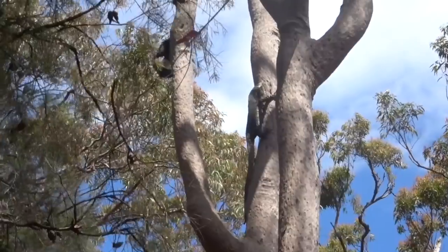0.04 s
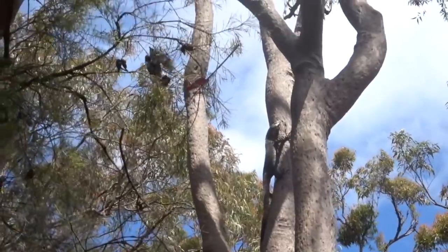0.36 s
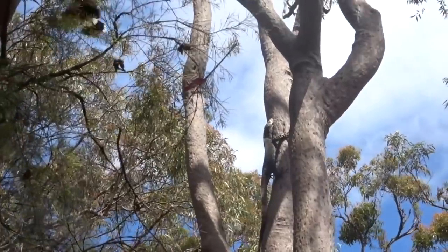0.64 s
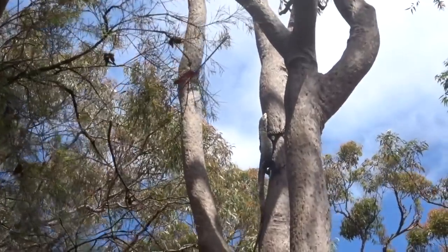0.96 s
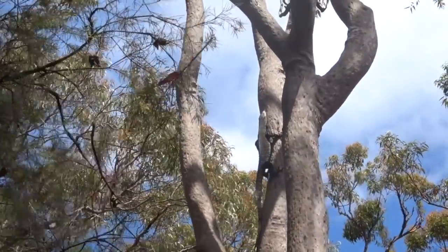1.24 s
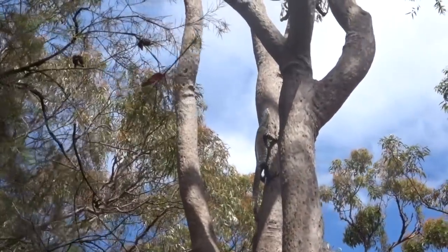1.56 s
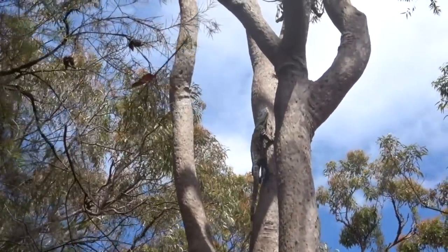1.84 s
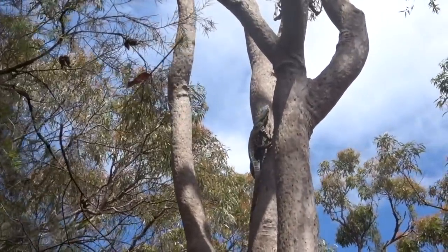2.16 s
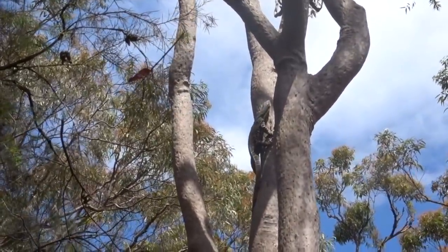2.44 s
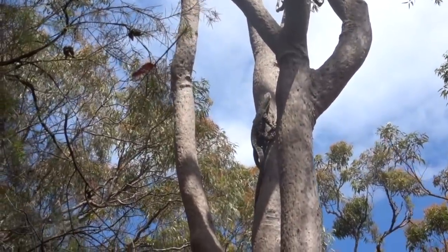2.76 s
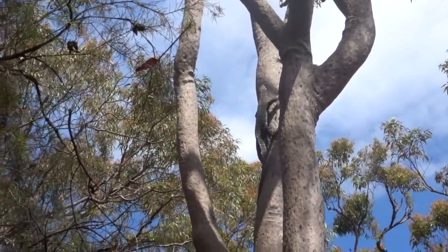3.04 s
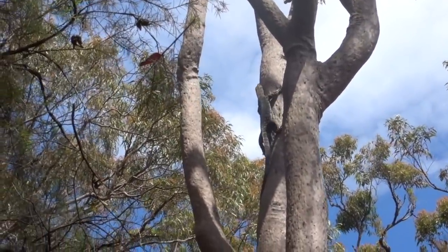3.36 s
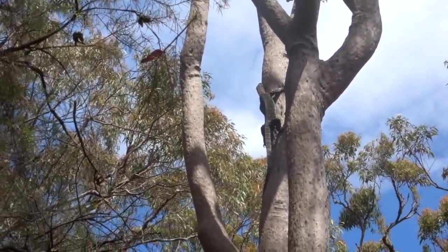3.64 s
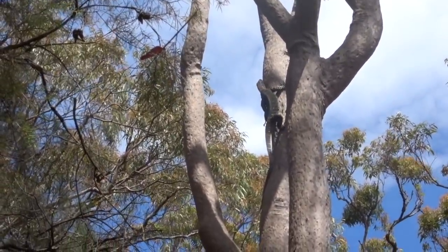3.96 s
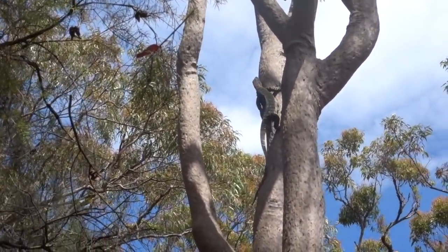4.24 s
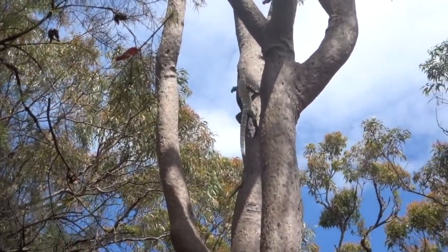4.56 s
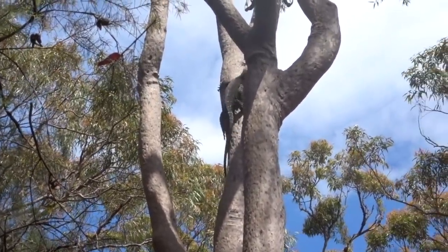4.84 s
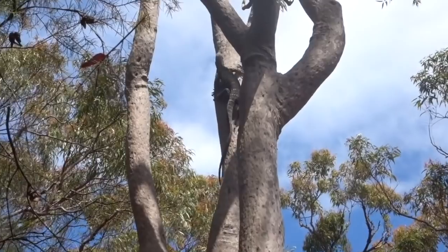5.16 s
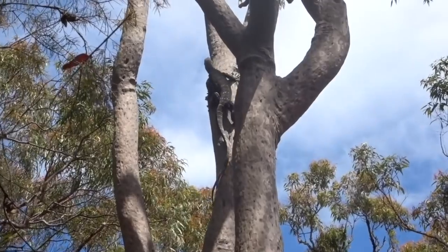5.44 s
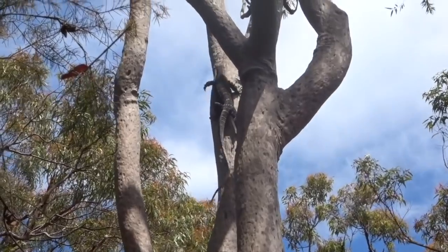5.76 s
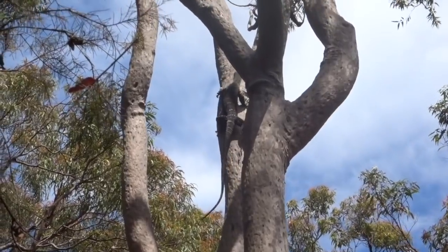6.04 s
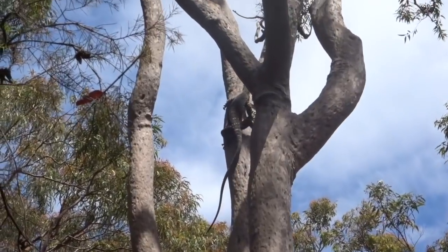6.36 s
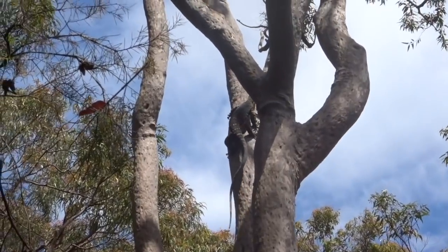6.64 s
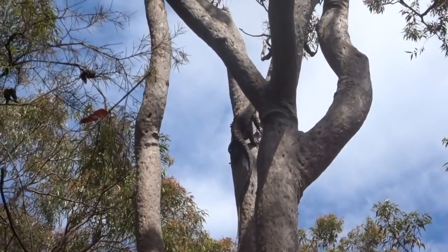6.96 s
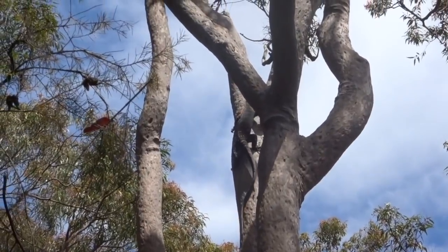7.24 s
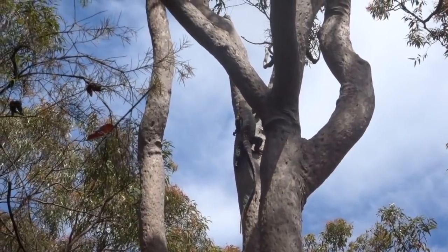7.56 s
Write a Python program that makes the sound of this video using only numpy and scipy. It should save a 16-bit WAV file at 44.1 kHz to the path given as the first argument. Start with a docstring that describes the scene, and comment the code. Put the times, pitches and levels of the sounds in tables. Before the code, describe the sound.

A bird gives five loud, slurred calls in two groups over steadily buzzing cicadas and light wind in a forest.

```python
"""Cicadas buzz in tall eucalypts, tymbal clicks ringing their bodies, over light wind and a faint far hum.
Dry leaves rustle and tick close by. A currawong gives two, then three slurred calls: a harmonic syrinx
tone holds, dives and climbs under the throat resonances, and the forest rings after each.
Wind bumps the microphone in the second half. A hollow click falls in the fourth call;
a small bird whistles far off near the end."""
import sys
import numpy as np
from scipy import signal
from scipy.fft import rfft, irfft
from scipy.io import wavfile

SR = 44100
rng = np.random.default_rng(int(sys.argv[2]) if len(sys.argv) > 2 else 0)


def to_wav(sig):
    """Store sig (one row per channel, or 1-D mono) as 16-bit WAV at the path in sys.argv[1].

    Samples outside -1..1 are clipped; the rate is SR.
    """
    pcm = np.clip(np.atleast_2d(sig), -1, 1) * 32767
    pcm = np.round(pcm).astype(np.int16)
    wavfile.write(sys.argv[1], SR, pcm.T)  # frames by channels


N = 339570
T = np.arange(N) / SR
HZ = np.fft.rfftfreq(N, 1 / SR)

# diffuse sound at the two microphones: (frequency [Hz], left-right coherence [0-1])
COHERENCE = [(30, 1), (120, 0.95), (1000, 0.88), (2500, 0.21), (5000, 0.07), (10000, 0.057)]
# forest reverberation: (frequency [Hz], T60 [s])
FOREST_T60 = [(300, 0.27), (800, 0.59), (1600, 1.12), (4000, 1.21), (9000, 0.39)]

# nearest tymbal speeding up: (initial rate [Hz], settled rate [Hz], time constant [s])
TYMBAL_RAMP = (98.9, 108.2, 6.9)
# tymbal of each cicada: (nominal rate [Hz], coupling to the ramp [0-1])
TYMBAL_RATES = [(102, 1), (117.9, .9), (109.35, 0)]
# body of each cicada: (resonance [Hz], width [Hz], relative level [dB], pan [dB])
CICADA_BODIES = [(4600, 630, -9, -4.5), (4407, 1300, -9.5, -5.5), (4417, 760, -18, 23.5)]
# band a body radiates: (frequency [Hz], gain [dB])
BODY_BAND = [(2800, -48), (3650, 1.5), (5400, 5), (6600, -11.5)]
# far chorus spectrum: (frequency [Hz], relative density [dB])
CHORUS_SPECTRUM = [(1760, -69), (3000, -61), (3470, -9), (3520, -71), (3630, -5.5), (3910, -13.5),
                   (4210, 1), (4640, -9.5), (4860, -15), (5030, -11), (5820, -14), (6190, -38), (6500, -33),
                   (8450, -43), (14300, -120)]
# cicada surges and lulls: (time [s], sigma [s], gain [dB])
CICADA_SURGES = [(0.493, 0.25, 1), (2.4, 0.36, 2), (4.58, 0.28, 2.5), (5.24, 0.2, -7), (5.793, .17, 2.5)]

# air in the trees: (frequency [Hz], relative density [dB])
AIR_SPECTRUM = [(12, -37), (20, -9), (49, -0.5), (67, 1.5), (166, -14.5), (248, -12), (401, -13.5),
                (484, -13), (516, -14.5), (818, -10), (2330, -28.5), (2480, -34.5), (3000, -32),
                (3900, -53), (6600, -120)]
# breeze contour, scaled to drive the rumble: (time [s], relative level [dB])
BREEZE = [(0, -46), (4.35, -46), (4.7, -35), (5.0, -47), (6.2, -41), (7.3, -43), (7.7, -40)]
# far foliage hiss: (frequency [Hz], relative density [dB])
HISS_SPECTRUM = [(2200, -33), (3000, 11.5), (6000, 11), (7000, 3.5), (9000, 6), (11000, -0.5)]
# gusts and soft knocks on the microphone: (time [s], level [dB], sigma [s], nominal top [Hz])
MIC_BUMPS = [(4.639, -19.5, 0.0056, 109), (4.68, -31, 0.02, 100), (4.766, -34, 0.0029, 328),
             (4.815, -28.5, 0.0023, 386), (4.852, -35, 0.0039, 328.5), (5.31, -39, 0.067, 111),
             (5.502, -29.5, 0.018, 140), (6.179, -26, 0.014, 191), (6.28, -36, 0.039, 89.8),
             (6.496, -31.5, 0.014, 195.5), (7.592, -37, 0.044, 128)]
# far hum: (time [s], pitch [Hz], level [dB])
HUM_TRACK = [(1.1, 226, -55), (2.8, 231.6, -62.5), (4.2, 253.7, -56.5), (5.1, 250.7, -60.5),
             (5.6, 250.7, -51), (6.1, 246.2, -53), (6.4, 246, -74), (7.7, 247.7, -59)]

# dry leaf: (frequency [Hz], relative density [dB])
LEAF_SPECTRUM = [(300, -2), (1000, 7), (2500, 2), (4000, 6), (7500, 2.5), (9500, 2.5), (11000, -2)]
# leaves brushed and settling: (time [s], peak [dB], rise [s], decay [s])
RUSTLES = [(.18, -39.5, 0.07, 0.087), (.68, -47, .04, .05), (.795, -36.5, 0.052, .075),
           (1.17, -44.5, 0.052, 0.044), (4.83, -44, 0.24, .05)]
# leaf and twig snaps: (time [s], level [dB], decay [s], tilt [dB/octave], pan [dB])
LEAF_TICKS = [(0.1867, -25, 0.001, 5, 0), (0.2237, -34, .002, 2, 4), (.6508, -26.5, 0.0025, -31, 5),
              (.6588, -24.5, 0.0016, -27, -2), (0.678, -35, .001, 6, 3), (0.7635, -24, 0.00097, -3, -3),
              (0.79, -13.5, 0.0011, 8, -4), (1.173, -36, 0.002, -3, -15), (1.342, -35, .001, 1, -1),
              (3.57, -27, .0015, 1.5, -10.5), (3.579, -23, 0.0011, -7, -11),
              (3.5838, -21.5, 0.0023, 0.5, -5), (4.0868, -29, 0.0013, 0, -2),
              (5.3812, -21, 0.00043, 11, -10), (5.384, -18.5, 0.0017, 1.5, -10.5)]

# currawong calls: (start [s], hold [s], trough [s], climb [s], linger [s], held pitch [Hz],
# trough pitch [Hz], final pitch [Hz], onset offset [dB], held level [dB], change over hold [dB],
# trough level [dB], final level [dB], held overtones [dB], slur overtones [dB], subharmonic [ratio])
CALLS = [ (1.502, 0.13, .065, .078, 0.041, 815, 671, 845.4, -4.5, -15.5, 1, -28, -22.5, -16.5, -23.5, 0.03),
         (2.019, 0.1, 0.029, 0.092, 0.1, 764.3, 625, 808.6, -3.5, -24, 0.5, -34.5, -27.5, -20, -29.5, 0.01),
         (4.492, 0.13, 0.04, 0.081, 0.029, 807.6, 670, 844.5, -10.5, -10.5, -10.5, -33, -20.5, -26, -33.5, 0.07),
         (5.017, .088, .036, .085, 0.041, 767, 619, 816, -1.5, -23, 2, -35.5, -20.5, -27.5, -27.5, 0.02),
         (5.704, 0.18, 0.0074, 0.06, 0.029, 805.5, 592, 748.5, -6, -16.5, -17.5, -35, -24.5, -26.5, -26.5, 0),
         ]
# pose per call: (upper throat resonance [Hz], beamed treble [dB], pan [dB], nominal phase smear [rad],
# fundamental gain [dB], share of reed lift [0-1])
CALL_POSES = [(8130, 0, 3.5, 0.08, 3, 0.6), (8400, -4.5, 1.5, 0.44, 3.5, 0.92),
              (6170, 0.5, 1.5, 1.7, 2.5, 0.2), (7750, -4.5, -1, 0.89, -4, 1),
              (8230, -10.5, -1.5, 0.9, -2, 0.3)]
# throat response, favouring harmonic 2: (frequency [Hz], gain [dB])
THROAT_RESPONSE = [(550, -12.5), (820, -18), (1150, -5), (1350, 3), (1680, -1), (2000, -30.5), (2450, -24),
                   (2900, -39), (3300, -27), (4100, -34), (4900, -22.5), (6000, -28), (8200, -30.5),
                   (9700, -32.5), (11000, -40.5)]
# odd multiples of the squared-off harmonic 2: (harmonic [number], full lift [dB])
REED_LIFT = [(6, 14.5), (10, 2)]
# sharp start of a call: (pitch excess [ratio], time constant [s])
SHARP_ONSET = (0.0249, 0.02245)
# brief dips and catches in the calls' level and pitch:
# (time [s], sigma [s], pitch bend [ratio], gain [dB], brightness [dB])
CALL_DIPS = [(1.527, .006, 0, -10, 9), (1.597, 0.0077, 0, -13, 11.5), (1.67, 0.022, 0.01, -3.5, -0.5),
             (1.699, 0.0086, .07, 2.5, 1), (2.078, 0.0077, -0.047, 1, 3), (2.098, 0.004, 0, -27, 6),
             (4.512, .005, .02, -6, 2), (4.6, 0.00495, -.12, -3, -4), (5.065, 0.0084, -.08, -0.5, -6),
             (5.745, 0.0041, 0, -11.5, 0), (5.764, .006, -.18, -6.5, -1), (5.821, 0.0092, -.18, -2, -11)]
# nasal squawks within the calls: (time [s], length [s], pitch [Hz], source level [dB])
CALL_SQUAWKS = [(1.666, 0.016, 870, -51), (4.616, 0.018, 860, -32.5), (4.632, 0.014, 870, -33.5),
                (5.136, 0.023, 847, -41), (5.848, 0.026, 808, -41)]
# wide-open beak: (frequency [Hz], gain [dB])
GAPE_RESPONSE = [(850, 0), (1700, -23), (2550, 5.5), (3400, 1), (4300, -23), (6000, -35), (8000, -16),
                 (11000, -19.5)]
# hollow click, likely the bill: (time [s], level [dB], decay [s], resonance [Hz], width [Hz], pan [dB])
HOLLOW_CLICK = (5.0400, -22, .0014, 2350, 1000, 6)
# distant small bird: (time [s], pitch [Hz], level [dB])
WHISTLE_TRACK = [(6.72, 2380, -66), (6.80, 2336, -56), (6.90, 2380, -77), (6.98, 2400, -77)]

CUTOFF_HZ = 11130


def amp(db):
    """Decibels to gain."""
    return 10 ** (np.asarray(db) / 20)


def unit_rms(x):
    """Scales to rms 1."""
    return x / np.sqrt(np.mean(x ** 2) + 1e-20)


def lookup(table, hz=HZ):
    """A spectrum table, interpolated in log frequency."""
    table_hz, value = np.transpose(table)
    return np.interp(np.log(hz + 1), np.log(table_hz + 1), value)


def curves(table):
    """Columns of a time table, per sample."""
    times_s, *columns = np.transpose(table)
    return [np.interp(T, times_s, column) for column in columns]


def bell(t, centre_s, sigma_s):
    """Gaussian of height 1."""
    return np.exp(-.5 * ((t - centre_s) / sigma_s) ** 2)


def add(mix, at_s, sound):
    """Mixes a sound in at at_s."""
    part = mix[round(at_s * SR):][:len(sound)]
    part += sound[:len(part)]


def colour(x, gain_db):
    """Filters by a gain per frequency."""
    return irfft(rfft(x) * amp(gain_db), N)


def lowpass(x, corner_hz):
    """Rolls off at 12 dB/octave."""
    return colour(x, -10 * np.log10(1 + (HZ / corner_hz) ** 4))


def wander(band_hz, count=N):
    """Smooth random curve, rms about 1."""
    spectrum = rfft(rng.standard_normal(N)) * np.exp(-(HZ / band_hz) ** 2) * (HZ > 0)
    return unit_rms(irfft(spectrum, N))[:count]


def panned(x, pan_db):
    """Pans by left minus right level."""
    return x * amp([[pan_db / 2], [-pan_db / 2]])


def diffuse(pair, coherence):
    """Two independent spectra to partly coherent left and right."""
    mid, side = np.sqrt(1 + coherence) * pair[0], np.sqrt(1 - coherence) * pair[1]
    return np.array([mid + side, mid - side])


def noise(table):
    """Coloured stereo noise, more alike in the bass."""
    white = diffuse(rfft(rng.standard_normal((2, N))), lookup(COHERENCE))
    return unit_rms(irfft(white * amp(lookup(table)), N))


def forest(x, early_db=4, early_s=0.05, gap_s=0.0049):
    """Trunks and leaves scatter sound: strong near echoes, then a long tail."""
    t = np.arange(2 * SR) / SR
    density = np.minimum(.01 + t / 2, .1)
    taps = rng.standard_normal((2, len(t))) * (rng.random((2, len(t))) < density)
    taps *= (t > gap_s) * (1 + amp(early_db) * np.exp(-t / early_s))
    hz, frame_s, spectra = signal.stft(taps, SR, nperseg=256)
    decay = amp(-60 * frame_s / lookup(FOREST_T60, hz)[:, None])
    spectra = diffuse(spectra, lookup(COHERENCE, hz)[:, None]) * decay
    tail = signal.istft(spectra, SR, nperseg=256)[1]
    return signal.fftconvolve(x[None], unit_rms(tail) / np.sqrt(tail.shape[1]), axes=1)[:, :N]


def tymbal(rate_hz, return_gain=.85, return_cycle=.5035, spread=.1, drift=.0015, tremble=.0003):
    """A tymbal clicks in and out once a cycle."""
    cycles = np.cumsum(rate_hz * (1 + drift * wander(1.6) + tremble * wander(26))) / SR
    click_cycles = (np.arange(1, int(cycles[-1]))[:, None] + [0, return_cycle]).ravel()
    position = np.interp(click_cycles, cycles, np.arange(N))
    size = np.resize([1, -return_gain], len(position)) * (1 + spread * rng.standard_normal(len(position)))
    index, fraction = position.astype(int), position % 1
    clicks = np.bincount(index, size * (1 - fraction), N + 1)
    clicks += np.bincount(index + 1, size * fraction, N + 1)
    return clicks[:N]


def cicadas(level_db=-37.5, far_db=-9, skirt_order=2.21):
    """Tymbal clicks ring three bodies; a far chorus blurs into hiss."""
    initial_hz, settled_hz, settle_s = TYMBAL_RAMP
    ramp = (settled_hz + (initial_hz - settled_hz) * np.exp(-T / settle_s)) / TYMBAL_RATES[0][0]
    near = np.zeros((2, N))
    for (rate_hz, coupling), (body_hz, width_hz, db, pan_db) in zip(TYMBAL_RATES, CICADA_BODIES):
        clicks = tymbal(rate_hz * ramp ** coupling)
        resonance_db = -20 * np.log10(1 + (abs(HZ - body_hz) / (width_hz / 2)) ** skirt_order)
        buzz = unit_rms(colour(clicks, resonance_db + lookup(BODY_BAND)))
        near += amp(db) * (panned(buzz, pan_db) + forest(buzz))
    far = amp(far_db) * noise(CHORUS_SPECTRUM)
    surge_db = sum(db * bell(T, at_s, sigma_s) for at_s, sigma_s, db in CICADA_SURGES)
    return unit_rms(unit_rms(near) + far) * amp(level_db + surge_db)


def wind(air_db=-41.5, hiss_db=-56, rumble_hz=140, flicker_db=-0.5, breeze_depth=0.78):
    """Air in the trees, a rumble that follows the breeze, far foliage hiss."""
    air = amp(air_db) * noise(AIR_SPECTRUM)
    low = lowpass(air, rumble_hz)
    breeze_db, = curves(BREEZE)
    rumble = low * amp(breeze_depth * (breeze_db - breeze_db.mean()))
    rush = (air - low) * amp(flicker_db * wander(7.7))
    return rush + rumble + amp(hiss_db) * noise(HISS_SPECTRUM)


def hum(waver=0.16):
    """A faint low tone drifts and wavers."""
    hz, db = curves(HUM_TRACK)
    return amp(db) * np.sqrt(2) * np.sin(2 * np.pi * np.cumsum(hz) / SR) * (1 + waver * wander(1.2))


def leaf_rustle(grains_per_s=5000, spread_db=3, crossfeed=0.28, stir_db=-57, stir_db_per_s=-2.5):
    """Dense tiny snaps swell as leaves are brushed, over a fading stir."""
    sizes = amp(spread_db * np.minimum(rng.exponential(1, (2, N)), 5)) * rng.standard_normal((2, N))
    grains = sizes * (rng.random((2, N)) < grains_per_s / SR)
    power = amp(stir_db + stir_db_per_s * T) ** 2
    for at_s, db, rise_s, decay_s in RUSTLES:
        swell = np.exp(-np.maximum((at_s - T) / rise_s, (T - at_s) / decay_s))
        power += (amp(db) * swell) ** 2
    return unit_rms(colour(grains + crossfeed * grains[::-1], lookup(LEAF_SPECTRUM))) * np.sqrt(power)


def leaf_ticks(forest_db=-21, antiphase=0.04, crackle_db=-19, crackle_s=0.0034, lead_s=.015):
    """Fibres crackle around each snap, so close that the two microphones disagree."""
    ticks = np.zeros((2, N))
    t, hz = T[:2048] - lead_s, np.fft.rfftfreq(2048, 1 / SR)
    octaves = np.log2(np.maximum(hz, 900) / 4000)
    for at_s, db, decay_s, db_per_octave, pan_db in LEAF_TICKS:
        response = amp(lookup(LEAF_SPECTRUM, hz) + db_per_octave * octaves) * (hz < CUTOFF_HZ)
        burst = irfft(rfft(rng.standard_normal((2, len(t)))) * response)
        burst = panned(unit_rms(burst - antiphase * burst[::-1]), pan_db)
        snap = (t >= 0) * np.exp(-abs(t) / decay_s)
        crackle = amp(crackle_db) * np.exp(-abs(t) / crackle_s)
        for channel, sound in zip(ticks, burst):
            add(channel, at_s - lead_s, amp(db) * (snap + crackle) * sound)
    return ticks + amp(forest_db) * forest(ticks.mean(0))


def call_gesture(start_s, hold_s, trough_s, climb_s, linger_s, held_hz, trough_hz, final_hz,
                 onset_db, held_db, fade_db, trough_db, final_db, overtone_db, slur_db):
    """Pitch, level, brightness and roughness of one call: hold, dive, trough, climb, linger."""
    swell_s, dive_s, release_s = .034, .028, .02
    release_db, beak_closing_db, warble_rms_db = -27, -29, 3
    wobble, dip_roughness = .004, .64
    dive, low, rise, top, end = start_s + np.cumsum([hold_s, dive_s, trough_s, climb_s, linger_s])
    t = np.arange(start_s, end, 1 / SR)
    sharp, settle_s = SHARP_ONSET
    pitch_hz = np.interp(t, [dive, low, rise, top], [held_hz, trough_hz, trough_hz, final_hz])
    pitch_hz *= 1 + sharp * np.exp((start_s - t) / settle_s) + wobble * wander(23.6, len(t))
    level_db = np.interp(t, [start_s, dive, low, rise, top],
                         [held_db, held_db + fade_db, trough_db, trough_db, final_db])
    bright_db = np.interp(t, [dive, low, rise + climb_s / 2, end],
                          [overtone_db, slur_db, slur_db, slur_db + beak_closing_db]) - level_db
    level_db += np.interp(t, [start_s, start_s + swell_s, end - release_s, end],
                          [onset_db, 0, 0, release_db])
    rough = np.interp(t, [start_s, start_s + swell_s, dive, low, rise, top],
                      [.67, .03, .03, .49, .49, .05])
    warble_db = warble_rms_db * wander(35, len(t)) * np.interp(t, [dive, low, top, end], [0, 1, 1, 0])
    level_db += warble_db
    bright_db -= warble_db  # only the main tone warbles
    for at_s, sigma_s, bend, gain_db, lift_db in CALL_DIPS:
        dip = bell(t, at_s, sigma_s)
        pitch_hz *= 1 + bend * dip
        rough += dip_roughness * dip
        level_db += gain_db * dip
        bright_db += lift_db * dip
    return t, pitch_hz, level_db, bright_db, rough


def syrinx_call(gesture, subharmonic, upper_hz, smear, fundamental_db, reed_share):
    """A harmonic tone slides under the throat resonances, hoarse at the onset, trough and dips."""
    upper_db, upper_width_hz, beak_open_hz = 7, 700, 2000
    jitter, shimmer, hoarseness, max_smear = .012, .8, .35, .65
    breath_db, breath_floor, breath_corner_hz = -20, .008, 2500
    t, pitch_hz, level_db, bright_db, rough = call_gesture(*gesture)
    throat_db = lookup(THROAT_RESPONSE) + upper_db * bell(HZ, upper_hz, upper_width_hz)
    pitch_hz *= 1 + jitter * rough * wander(355, len(t))
    phase = 2 * np.pi * np.cumsum(pitch_hz) / SR
    unrest = wander(260)  # uneven membrane closure blurs each high partial separately
    blur = np.minimum(smear + rough * hoarseness, max_smear)
    reed_db = {round(k): db * reed_share for k, db in REED_LIFT}
    flutter = rough * shimmer * wander(120, len(t))
    tone = np.zeros(len(t))
    for k in np.arange(2, 35) / 2:
        # the second side of the syrinx beats at half the pitch
        weight = subharmonic * (7 if k > 2 else 1) if k % 1 else 1
        partial_db = np.interp(k * pitch_hz, HZ, throat_db) + reed_db.get(k, 0)
        partial_db += fundamental_db * (k == 1)
        partial_db += bright_db * np.clip(k * pitch_hz / beak_open_hz - 1, 0, 1)
        blur_rad = blur * np.clip(k / 4 - 1, 0, 1) * (1.5 - reed_share * (k in reed_db))
        phase_noise = blur_rad * np.roll(unrest, rng.integers(N))[:len(t)]
        tone += weight * amp(partial_db) * (1 + flutter * min(1, 3 / k)) * np.sin(k * phase + phase_noise)
    highpass_db = -10 * np.log10(1 + (breath_corner_hz / (HZ + 1)) ** 6)
    turbulence = unit_rms(colour(rng.standard_normal(N), throat_db + highpass_db))[:len(t)]
    puffs = turbulence * (1 + np.sin(phase))
    rasp = amp(breath_db + bright_db / 2) * (rough + breath_floor) * puffs
    return t[0], (tone * np.sqrt(2) + rasp) * amp(level_db) * signal.windows.tukey(len(t), .015)


def currawong(direct_db=-1, forest_db=-10, beam_hz=2300, echo_s=.077, echo_db=-12.5):
    """Five calls, a trunk echo and reverberation; with the head turned, treble arrives via the trees."""
    scattered, squawks, echo = np.zeros((3, N))
    direct = np.zeros((2, N))
    for (*gesture, subharmonic), (upper_hz, beam_db, pan_db, *timbre) in zip(CALLS, CALL_POSES):
        voice = np.zeros(N)
        add(voice, *syrinx_call(gesture, subharmonic, upper_hz, *timbre))
        shelf_db = beam_db * HZ ** 4 / (HZ ** 4 + beam_hz ** 4)
        direct += panned(colour(voice, shelf_db), pan_db)
        scattered += colour(voice, -.4 * shelf_db)
    for at_s, length_s, pitch_hz, db in CALL_SQUAWKS:
        add(squawks, at_s, amp(db) * squawk(length_s, pitch_hz))
    add(echo, echo_s, amp(echo_db) * lowpass(scattered, beam_hz))
    return amp(direct_db) * (direct + squawks) + echo + amp(forest_db) * forest(scattered + squawks)


def squawk(length_s, pitch_hz, jitter=0.023):
    """A brief shaky note through the wide-open beak."""
    count = int(length_s * SR)
    phase = 2 * np.pi * np.cumsum(pitch_hz * (1 + jitter * wander(260, count))) / SR
    tone = sum(amp(lookup(GAPE_RESPONSE, k * pitch_hz)) * np.sin(k * phase) for k in range(1, 14))
    return unit_rms(tone) * signal.windows.tukey(count, .5)


def mic_bumps(side_gain=.14):
    """Gusts and soft knocks push both microphones nearly alike."""
    bumps = np.zeros((2, N))
    for at_s, db, sigma_s, top_hz in MIC_BUMPS:
        mid, side = (unit_rms(np.gradient(wander(top_hz * 0.68))) for _ in range(2))
        window = bell(T, at_s, sigma_s)
        bump = window * np.array([mid + side_gain * side, mid - side_gain * side])
        bumps += amp(db) * unit_rms(bump) * np.sqrt(np.mean(window ** 2))
    return bumps


def hollow_click():
    """A tiny noise burst with one broad resonance."""
    at_s, db, decay_s, ring_hz, width_hz, pan_db = HOLLOW_CLICK
    ring_db = -10 * np.log10(1 + ((HZ - ring_hz ** 2 / (HZ + 1)) / width_hz) ** 2)
    burst = unit_rms(colour(rng.standard_normal(N), ring_db))
    return panned(amp(db) * burst * (T >= at_s) * np.exp(-abs(T - at_s) / decay_s), pan_db)


def far_bird():
    """One thin whistle, heard only as forest scatter."""
    hz, db = curves(WHISTLE_TRACK)
    gate = (T > WHISTLE_TRACK[0][0]) & (T < WHISTLE_TRACK[-1][0])
    return forest(amp(db) * gate * np.sin(2 * np.pi * np.cumsum(hz) / SR))


def scene():
    """Stereo sum of all sources."""
    birds = currawong() + hollow_click() + far_bird()
    return birds + cicadas() + wind() + mic_bumps() + hum() + leaf_rustle() + leaf_ticks()


def record(dry, start_s=.083, fade_s=.006):
    """A moment of silence, a fast fade-in, top treble cut."""
    faded_in = dry * np.clip((T - start_s) / fade_s, 0, 1)
    treble_cut = signal.firwin(401, CUTOFF_HZ, window=("kaiser", 9), fs=SR)
    return signal.oaconvolve(faded_in, treble_cut[None], "same")


dry = scene()
out = record(dry)
to_wav(out)
```